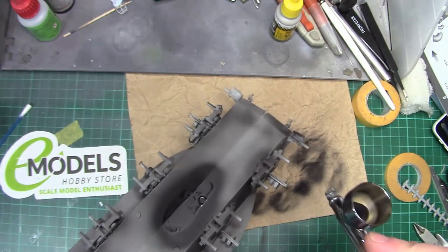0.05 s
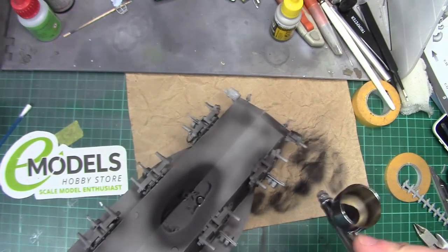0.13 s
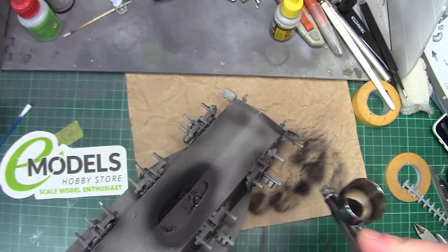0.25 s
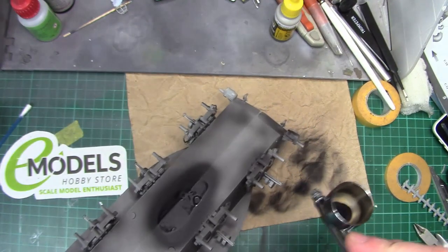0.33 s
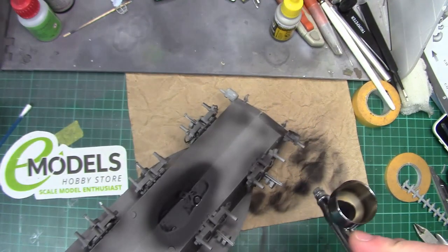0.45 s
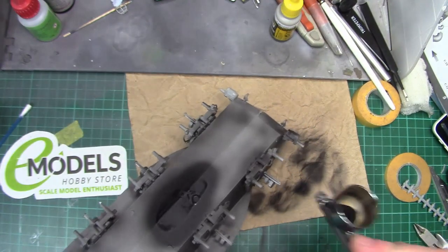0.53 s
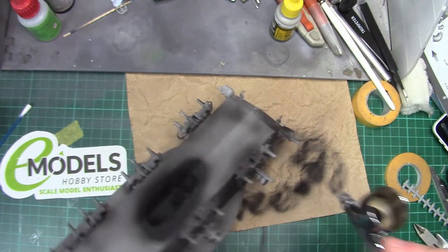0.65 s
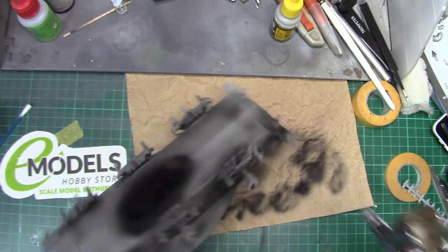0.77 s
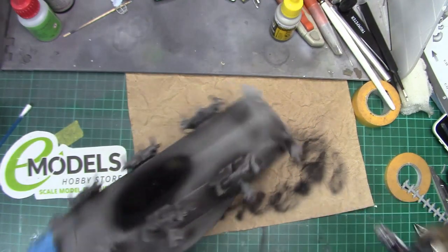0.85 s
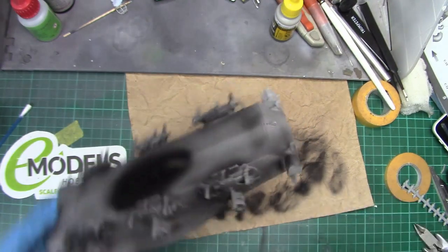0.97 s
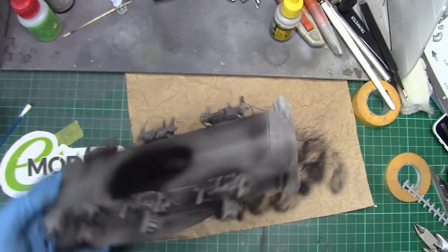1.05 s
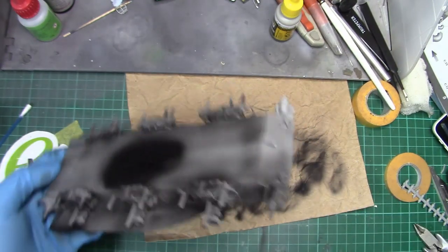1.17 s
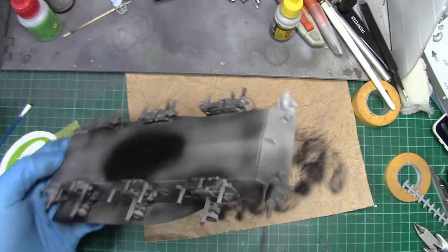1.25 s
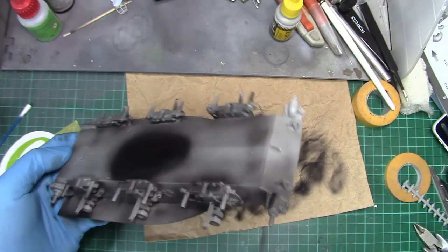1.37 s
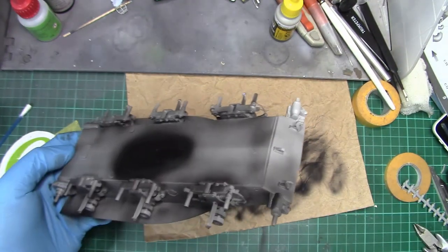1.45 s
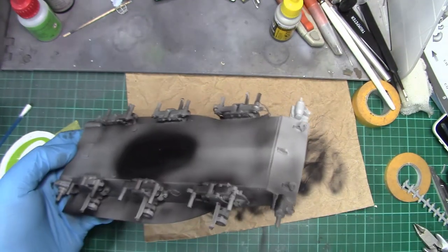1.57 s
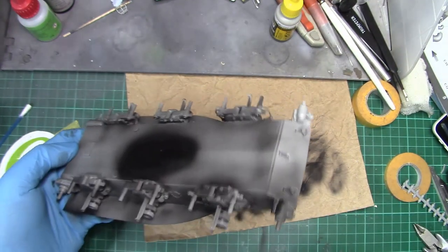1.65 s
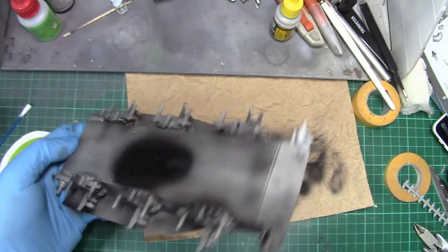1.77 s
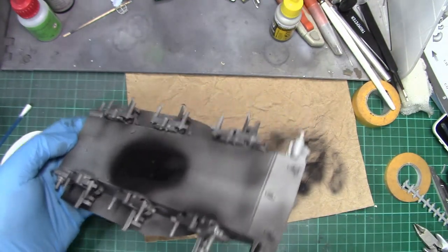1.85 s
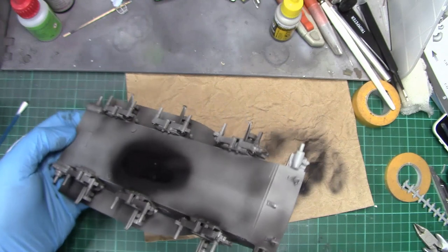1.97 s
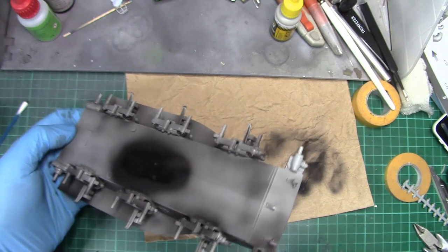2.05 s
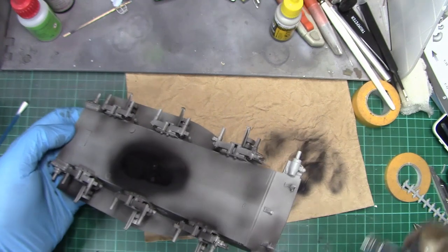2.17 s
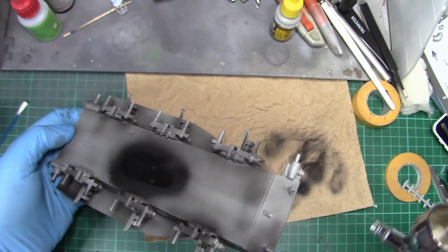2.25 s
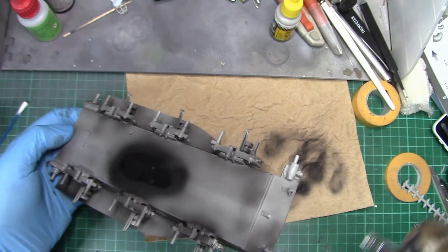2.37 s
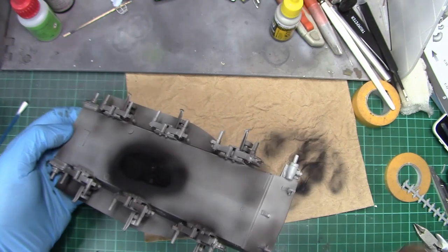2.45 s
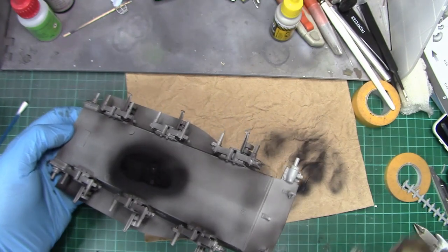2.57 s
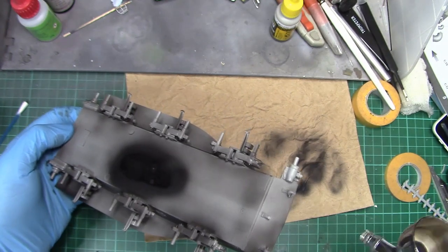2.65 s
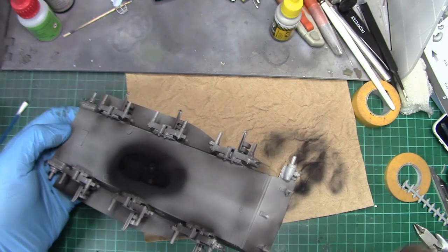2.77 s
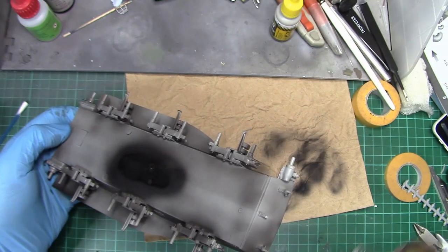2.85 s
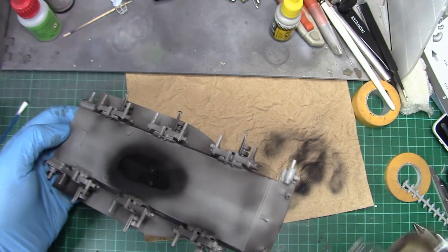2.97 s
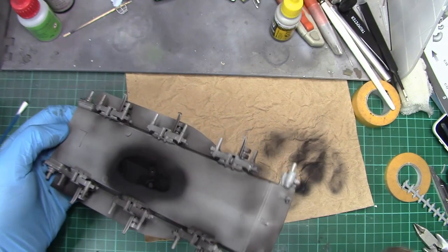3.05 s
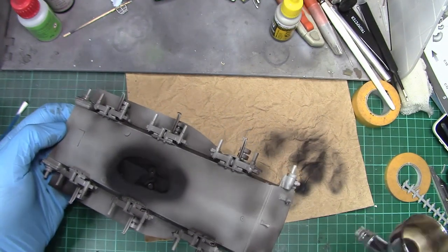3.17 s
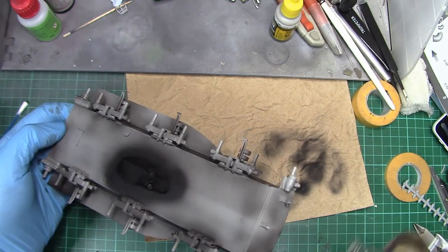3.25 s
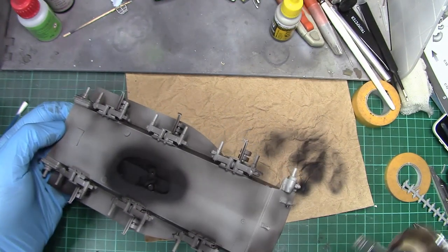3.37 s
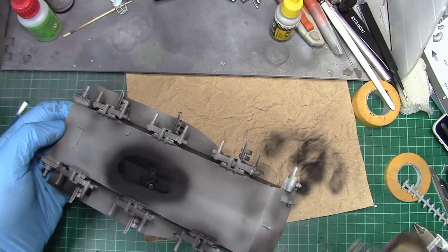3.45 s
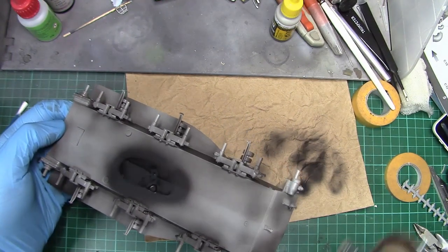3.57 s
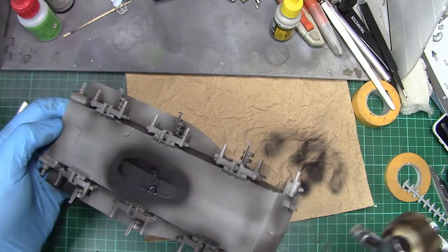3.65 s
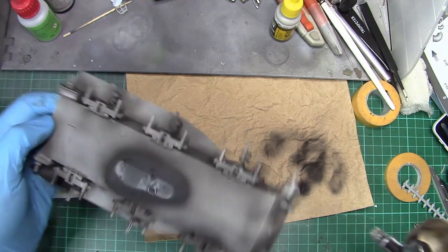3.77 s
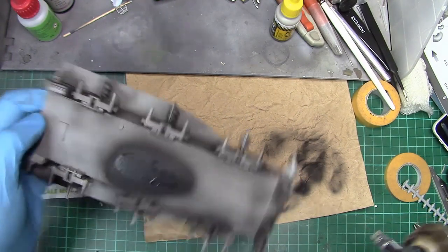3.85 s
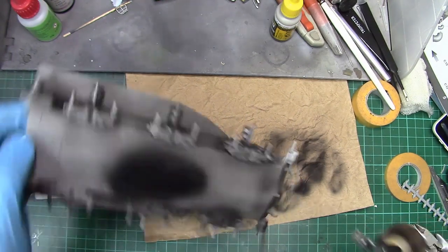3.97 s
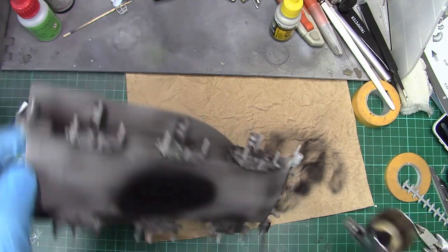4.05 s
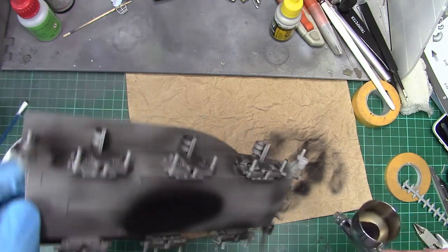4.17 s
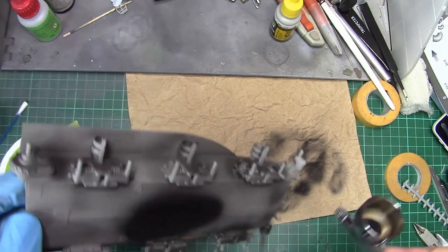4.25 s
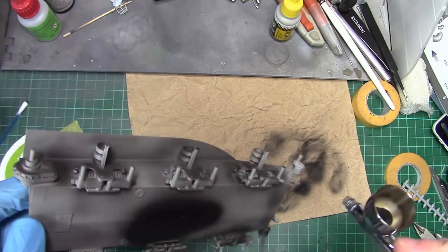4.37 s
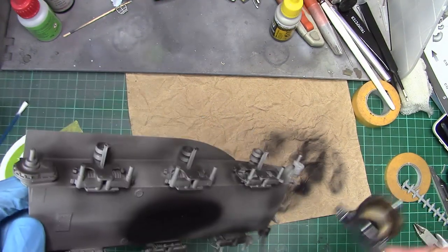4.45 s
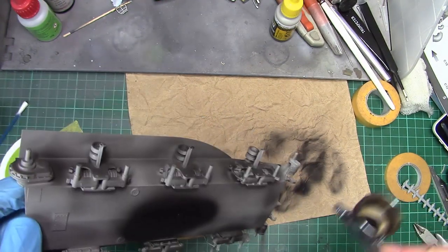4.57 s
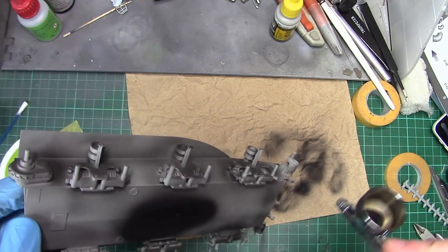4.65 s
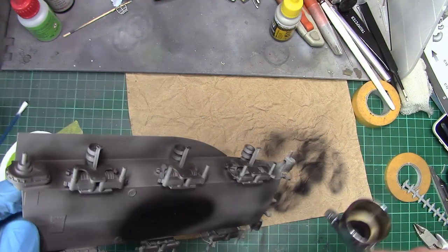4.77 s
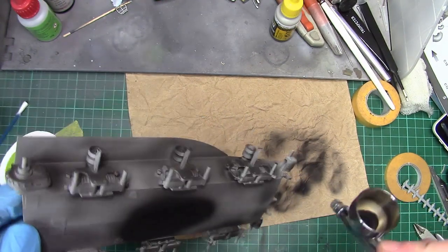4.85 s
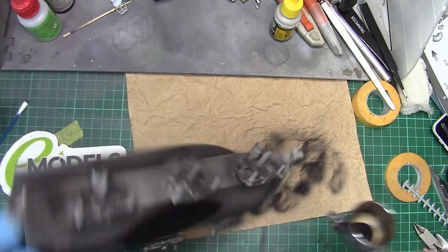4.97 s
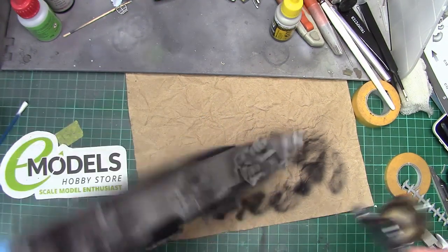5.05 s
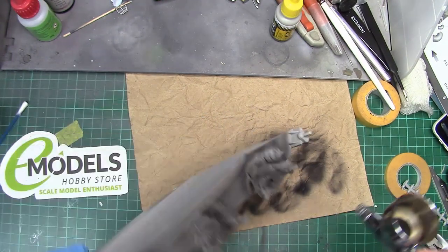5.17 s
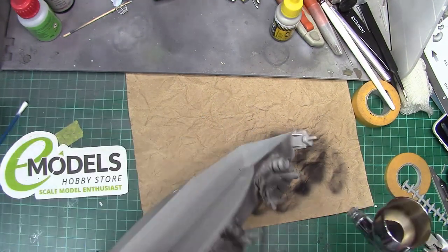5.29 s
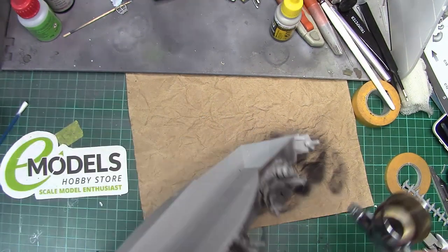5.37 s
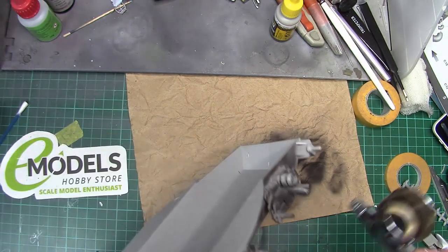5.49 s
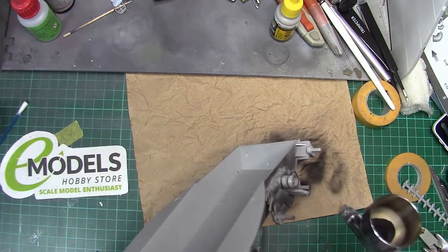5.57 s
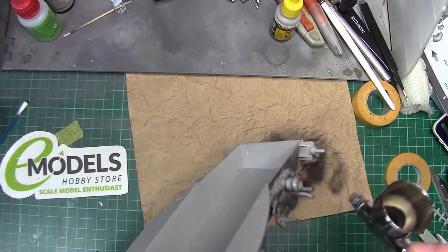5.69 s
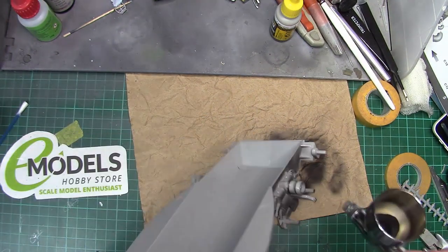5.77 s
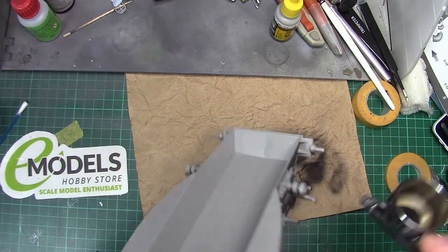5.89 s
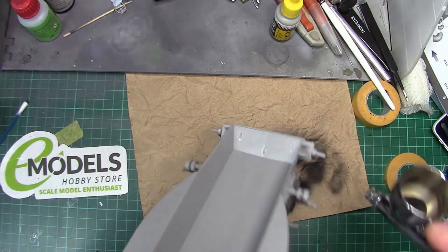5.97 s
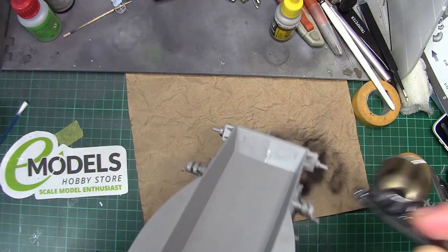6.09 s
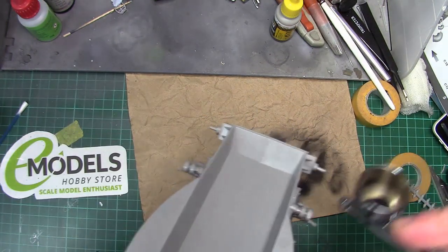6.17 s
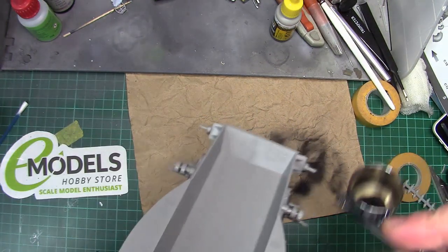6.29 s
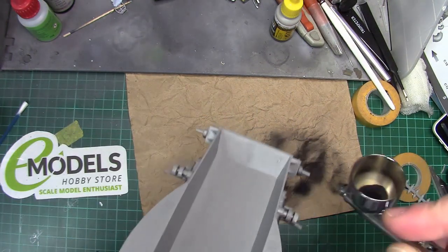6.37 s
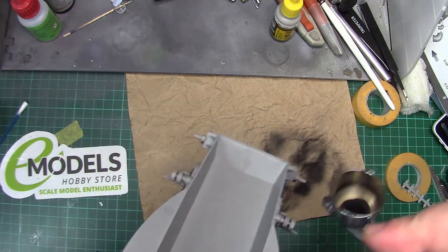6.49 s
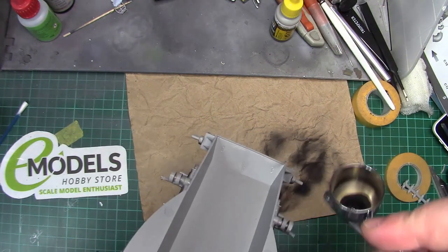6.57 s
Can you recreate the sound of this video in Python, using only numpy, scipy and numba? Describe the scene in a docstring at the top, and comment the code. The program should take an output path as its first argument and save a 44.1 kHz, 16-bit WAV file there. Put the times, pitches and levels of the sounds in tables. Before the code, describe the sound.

An airbrush blows five hissing bursts onto a hollow plastic model, with short gaps where a small piston compressor chugs and hums nearby.

```python
"""Airbrush and small compressor

An airbrush sprays a hollow plastic model on a workbench in five bursts, heard from a camera looking down.
The nozzle is hissing noise; where the jet meets the model, filtered noise roars, rings and echoes off the bench.
Thin whistles and a small tick come from the trigger, a few stray squeaks from the compressor's valve reeds.
A piston compressor chugs nearby as puffs ringing in a pipe, over a sine of motor hum and soft room air."""
import sys
import numpy as np
from scipy import signal
from scipy.fft import rfft, irfft, next_fast_len
from scipy.io import wavfile
from scipy.ndimage import uniform_filter1d
from numba import njit

SR = 44100
rng = np.random.default_rng(int(sys.argv[2]) if len(sys.argv) > 2 else 0)


def put_to_file(sound):
    """Save the sound as 16-bit audio at rate SR, in the file named by the first command-line argument."""
    columns = np.atleast_2d(sound).T  # one column per channel
    safe = np.clip(columns, -1, 1)
    whole_steps = np.round(safe * 32767)
    wavfile.write(sys.argv[1], SR, whole_steps.astype(np.int16))


N = 292383  # length in samples


def undb(db):
    """Turn decibels into a plain factor."""
    return 10 ** (np.asarray(db) / 20)


def level(x, db):
    """Scale a sound to an average (rms) level in dB."""
    return x * undb(db) / np.sqrt(np.mean(x ** 2))


def colour(x, points):
    """Shape a sound by (pitch_hz, level_db) points, flat beyond the ends."""
    hz, db = np.transpose(points)
    size = next_fast_len(N)
    # the 1 keeps the logarithm finite at 0 Hz
    log_hz = np.log(np.arange(size // 2 + 1) * SR / size + 1)
    gain = undb(np.interp(log_hz, np.log(hz), db))
    return irfft(rfft(x, size) * gain, size)[:N]


def curves(table):
    """Draw straight lines through the rows; one curve for each column after the time."""
    s, *columns = np.transpose(table)
    return [np.interp(np.arange(N) / SR, s, column) for column in columns]


def walk(rate):
    """Random levels held 1 / rate seconds, then smoothed twice; spread near 1."""
    hold = int(SR / rate)
    steps = np.repeat(rng.standard_normal(N // hold + 1), hold)
    return 1.07 * uniform_filter1d(uniform_filter1d(steps, hold), hold)[:N]


def delayed(x, lag_s):
    """The same sound later; the delay may move."""
    return np.interp(np.arange(N) - lag_s * SR, np.arange(N), x)


def echo(x, lag_s, share):
    """The sound plus a later copy of itself."""
    return x + share * delayed(x, lag_s)


@njit
def svf(x, hz, width):
    """Resonance (state-variable band-pass) with moving centre and width in Hz, gain 1 at the centre."""
    y, band, low = np.empty(len(x)), 0., 0.
    for i in range(len(x)):
        g, k = np.tan(np.pi * hz[i] / SR), width[i] / hz[i]
        v = (band + g * (x[i] - low)) / (1 + g * (g + k))
        band, low, y[i] = 2 * v - band, low + 2 * g * v, k * v
    return y


def peaked(x, width_hz, *peaks):
    """Unit-level sound with moving (pitch_hz, level_db) resonances added to it."""
    out = level(x, 0)
    for hz, db in peaks:
        resonance = svf(x, hz, np.full(N, width_hz))
        out = out + undb(db) * level(resonance, 0)
    return out


# tone of the room air: pitch_hz, level_db
AIR_TONE = [(25, -18), (60, -17), (120, -1), (300, -2), (600, -16), (1000, -9), (1800, -19), (2500, -23.5),
            (3100, -22), (7000, -24), (15800, -42)]


def room_air():
    """The quiet room: steady noise with a fixed tone."""
    return level(colour(rng.standard_normal(N), AIR_TONE), -52)


def motor_hum():
    """The motor's steady hum: one sine."""
    hum_hz, hum_db = 121.6, -51.5  # rms level
    return np.sqrt(2) * undb(hum_db) * np.sin(2 * np.pi * hum_hz * np.arange(N) / SR)


# valve reed squeaks, once a stroke: place in the stroke (0-1), length (share of a stroke),
# pitch_hz, level_db (rms), extra_db on every second stroke before that level is set
REED_SQUEAKS = [(.41, .12, 1170, -61, 0), (.83, .16, 2370, -63, 6)]


def reed_squeaks(turn, stroke):
    """The valve reeds squeak: sines that swell at a set place in each stroke, unevenly loud."""
    t, out = np.arange(N) / SR, 0
    for place, length, hz, db, second_db in REED_SQUEAKS:
        luck = rng.standard_normal(stroke[-1] + 1)[stroke]
        swell = np.exp(-((turn % 1 - place) / length) ** 2)
        swell = swell * undb(5.5 * luck + second_db * (1 - stroke % 2))
        rough = 1 + .5 * walk(150)
        out = out + level(swell * rough * np.sin(2 * np.pi * hz * t), db)
    return out


def valve_rattle():
    """The compressor's valve noise: a steady band of noise around 2300 Hz."""
    noise = rng.standard_normal(N)
    return level(svf(noise, np.full(N, 2300.), np.full(N, 600.)), -57)


# compressor strokes, a little quicker as time goes on: time_s, stroke number
STROKE_TIMES = [(-.0303, 0), (.7084, 16), (3.8469, 84), (5.0920, 111), (5.9216, 129), (6.6589, 145)]
# tone of one soft puff, without treble: pitch_hz, level_db
PUFF_TONE = [(50, 5), (780, 0), (1000, -37), (1300, -35), (2000, -60)]
# ringing of the casing and intake pipe: pitch_hz, width_hz, level_db (against each other),
# added_width_hz late in the stroke
PIPE_RINGS = [(65, 11, -28, 0), (130.7, 4, -16.5, 19), (171.2, 11.4, -7.5, -6), (288.8, 17.8, 3, 40),
              (358.6, 22.5, -2, 60), (424.4, 13.3, -0.5, 56), (540, 2.7, -17, 60), (705.5, 5.8, -2, 130)]


def compressor():
    """Each stroke puffs into the intake pipe; late in the stroke the open valve changes how fast it dies away."""
    time_s, count = np.transpose(STROKE_TIMES)
    turn = np.interp(np.arange(N) / SR, time_s, count)
    stroke = turn.astype(int)
    size = undb(.6 * rng.standard_normal(stroke[-1] + 1)[stroke])
    puffs = colour(-size * np.diff(stroke, prepend=0), PUFF_TONE)
    valve_open = np.exp(-((turn % 1 - .84) / 0.057) ** 2)
    pipe = 0
    for hz, width, db, added_width in PIPE_RINGS:
        widths = width + added_width * valve_open
        pipe = pipe + undb(db) * svf(puffs, np.full(N, 1. * hz), widths) / widths
    return level(pipe, -36.5) + motor_hum() + reed_squeaks(turn, stroke) + valve_rattle()


# thin whistles from the trigger, and a few stray squeaks near 2400 Hz from the compressor's valve reeds:
# start_s, length_s, start_hz, end_hz, level_db (rms before fading and wavering)
WHISTLES_AND_STRAY_SQUEAKS = [(.7, .04, 3760, 3750, -58), (3.82, .17, 3000, 3240, -56),
                              (3.945, .04, 3190, 3250, -52), (3.96, .05, 2400, 2560, -53),
                              (5.065, .044, 2350, 2310, -47), (5.12, .07, 4280, 4290, -60),
                              (5.215, .026, 2400, 2460, -49), (5.99, .03, 2400, 2400, -55)]


def whistles_and_stray_squeaks():
    """Trigger whistles and stray reed squeaks: narrow noise that glides, swells and wavers."""
    t, out = np.arange(N) / SR, 0
    waver = undb(2.5 * walk(180))
    for start_s, length_s, start_hz, end_hz, db in WHISTLES_AND_STRAY_SQUEAKS:
        part = np.clip((t - start_s) / length_s, 0, 1)
        pitch = start_hz + (end_hz - start_hz) * part
        breathy = level(svf(rng.standard_normal(N), pitch, np.full(N, 25.)), db)
        out = out + np.sin(np.pi * part) ** .5 * waver * breathy
    return out


# trigger ticks: start_s, level_db (roughly the peak)
TRIGGER_TICKS = [(3.835, -44)]


def trigger_ticks():
    """A small metal tick: three high sines that die away in a few milliseconds."""
    t, out = np.arange(N) / SR, 0
    for start_s, db in TRIGGER_TICKS:
        since = t - start_s
        ring = sum(np.sin(2 * np.pi * hz * since) for hz in (3600, 5150, 5800)) / 2
        out = out + undb(db) * (since > 0) * np.exp(-np.abs(since) / .003) * ring
    return out


# trigger pulls: half_open_s, half_shut_s, creep_db (air creeping out just before)
TRIGGER_PULLS = [(-.2, 0.639, -40), (1.038, 3.759, -36), (4.039, 5.033, -24), (5.262, 5.833, -42),
                 (6.144, 6.94, -54)]


def valve():
    """Air flow, near 0 shut and 1 open: a faint creep, a smooth opening, a quicker shutting and a short tail."""
    open_s, shut_s, creep_s, tail_s = 0.0092, 0.0042, 0.063, .016  # how gradual each step is
    tail_share = 0.27  # air left in the brush that runs out after each pull
    t, flow = np.arange(N) / SR, 0

    def step(x):
        """A smooth rise from 0 to 1."""
        return .5 + .5 * np.tanh(x / 2)

    for opens, shuts, creep_db in TRIGGER_PULLS:
        rise = step((t - opens) / open_s) + undb(creep_db) * step((t - opens) / creep_s)
        fall = (1 - tail_share) * step((shuts - t) / shut_s) + tail_share * step((shuts - t) / tail_s)
        flow = flow + rise * fall
    return flow


# tone of the nozzle hiss: pitch_hz, level_db
HISS_TONE = [(470, -40), (800, -46), (977, -2), (1210, -65), (1550, -10.5), (2860, -11.5), (5970, -1.5),
             (7020, -2.5), (7760, -1.5), (15800, -5.5)]


def nozzle_hiss(gain):
    """Air rushing from the nozzle: gently fluttering noise with a resonance of the nozzle cap."""
    cap_hz, cap_db = 13140, -20
    noise = colour(rng.standard_normal(N), HISS_TONE)
    return peaked(noise, 1100., (np.full(N, 1. * cap_hz), cap_db)) * gain * undb(1.0 * walk(40))


# tone of the roar where the jet strikes: pitch_hz, level_db
ROAR_TONE = [(150, -35), (300, -13), (450, 0), (800, -3), (1150, -7), (1500, -2), (2200, -17.5),
             (4000, -41)]


def hull_roar(gain, hull_hz, hull_db, rumble_db):
    """The jet roars on the model: low noise with a hull resonance, plus rumble from air over flat panels."""
    rumble_tone = [(100, -20), (200, -3.5), (300, -0.5), (450, -8), (800, -29)]  # pitch_hz, level_db
    rumble = level(colour(rng.standard_normal(N), rumble_tone), rumble_db)
    roar = peaked(colour(rng.standard_normal(N), ROAR_TONE), 180.0, (hull_hz, hull_db))
    return (roar + rumble) * gain


def hollow_ring(gain, hollow_hz, width_hz):
    """The hollow rings: noise through the same moving resonance twice."""
    once = svf(rng.standard_normal(N), hollow_hz, width_hz)
    return level(svf(once, hollow_hz, width_hz), 0) * gain


# tone of the edge noise: pitch_hz, level_db
EDGE_TONE = [(1200, -25), (2000, 5.5), (2800, -2.5), (4000, 2.5), (5500, -0.5), (7500, -3.5), (11000, -37)]


def edge_noise(gain, fitting_hz, fitting_db):
    """Air tears at the edges: brighter noise with the ring of two fittings, one lower than the other."""
    higher = fitting_hz, fitting_db
    lower = 0.774 * fitting_hz, fitting_db + 1.5
    return peaked(colour(rng.standard_normal(N), EDGE_TONE), 310.0, higher, lower) * gain


# what bench clutter throws back: pitch_hz, level_db
CLUTTER_TONE = [(700, -31), (1800, -11), (4000, -8.5), (15000, -17)]


def clutter(jet, count=8):
    """Short echoes off hands, model and tools; their paths drift as the hands move."""
    back = 0
    for lag_s in 0.000804 + .004 * rng.random(count):
        back = back + delayed(jet, lag_s + .00007 * walk(2.53))
    return jet + colour(back / np.sqrt(count), CLUTTER_TONE)


# how model and brush are held: time_s, hiss_db, rumble_db (against the roar), hull_hz, hull_db
# (against the roar), hollow_hz, hollow_width_hz, extra_ring_db, extra_edge_db, fitting_hz,
# extra_fitting_db, bench echo (0-1)
HOLDING = [(0, -24, -18, 1020, -1.5, 1380, 400, 0.5, 1.5, 4450, 0, 0.02),
           (.62, -23.5, -14, 1036, 5.5, 1480, 400, 5.5, 7, 4500, 2, 0.04),
           (1.03, -22.5, -4, 790, -16, 1770, 400, 1, -11, 3300, 1.5, 0.16),
           (1.27, -24, 2, 800, -11, 1710, 400, -5, -13, 3300, 1.5, 0.2),
           (1.29, -22.5, -2.5, 800, -7, 1544, 200, 11, -1, 3350, 1.5, 0),
           (1.52, -22, -11, 800, -22, 1570, 198, 5, -0.5, 3420, -6, 0),
           (1.72, -23.5, -21, 810, -12, 1560, 260, 0.5, -5, 3370, 2, 0),
           (2.1, -21, -39, 990, -15.5, 1694, 330, 2.5, 0.5, 3760, -3, 0.3),
           (2.5, -23.5, -40, 1020, -4, 1726, 405, 3.5, -0.5, 3900, 4.5, 0.2),
           (2.8, -22, -19, 860, -23, 1810, 420, -3.5, -6.5, 3800, 3, 0.16),
           (3.3, -20, -18.5, 930, -5.5, 1810, 413, -0.5, -1, 3820, 0.5, 0.02),
           (3.75, -23, -22, 1000, -4.5, 1770, 420, 10, 8, 3780, -3, .15),
           (4.05, -24.5, -16, 1000, 4.5, 1976, 700, 7, 8.5, 4100, 1.5, 0.05),
           (4.5, -25.5, -14, 1040, 1, 1930, 715, 3, 12.5, 4030, -4, 0),
           (5.0, -24.5, -19, 1010, 0.5, 1830, 805, 3, 7, 4040, -3, 0),
           (5.25, -23.5, -20, 950, -5, 1790, 850, -4.5, 3.5, 3720, -5, 0.35),
           (5.85, -21, -19, 960, -11.5, 1710, 830, -0.5, 6.5, 3640, -5, 0.2),
           (6.12, -23, -25, 1040, -2, 1750, 810, 3.6, 3, 3650, 0.5, 0.34),
           (6.63, -23.5, -21, 1010, -9, 1800, 800, 1, -1.5, 3660, 3, 0.5)]
# how hard the jet strikes the model, one curve for each pull: time_s, level_db
STRIKE_CURVES = [
    [(0.0, -21.5), (0.154, -21), (0.208, -27), (0.292, -22), (0.536, -25), (0.592, -30), (0.62, -39)],
    [(1.05, -27), (1.15, -35), (1.21, -46), (1.36, -19.5), (1.37, -25.5), (1.53, -27), (1.62, -17.5),
     (1.63, -20), (1.72, -11.5), (1.78, -12.5), (1.82, -20.5), (2.01, -14.5), (2.02, -11), (2.03, -14.5),
     (2.04, -12), (2.18, -15.5), (2.26, -19.5), (2.4, -14), (2.52, -15.5), (2.54, -19.5), (2.68, -21.5),
     (2.9, -21), (3.42, -20.5), (3.46, -24.5), (3.65, -23.5), (3.74, -37.5)],
    [(4.05, -32.5), (4.108, -28.5), (4.3, -27.5), (4.344, -37), (4.486, -27), (4.574, -30), (4.6, -33.5),
     (4.69, -27.5), (4.84, -29.5), (4.93, -22.5), (5.02, -31)],
    [(5.27, -31), (5.392, -21.5), (5.812, -19.5), (5.83, -18.5)],
    [(6.16, -21), (6.238, -19.5), (6.264, -19), (6.276, -19), (6.346, -23.5), (6.462, -14), (6.584, -20),
     (6.63, -15)],
]
# what seeps out all the time: hiss_db, roar_db, ring_db, edge_db
SEEP_DB = (-72, -57.5, -62, -66.5)


def spray():
    """Turbulent jet: hiss at the nozzle, and fluttering roar, ring and edge noise where it strikes."""
    (hiss_db, rumble_db, hull_hz, hull_db, hollow_hz, hollow_width, ring_db, edge_db,
     fitting_hz, fitting_db, bounce) = curves(HOLDING)
    usual_db = -18
    strike = curves(np.concatenate(STRIKE_CURVES))[0] - usual_db  # dB above the usual strike
    # level at the usual strike, plus dB gained per dB of strike
    levels_db = (hiss_db - 0.14 * np.maximum(strike, 0),  # a hard strike weakens the hiss a little
                 -22.5 + 0.91 * strike,
                 -21.5 + 1.7 * strike + ring_db,
                 -25.5 + 1.05 * strike + edge_db)
    fitting_db = fitting_db - 8.5 + 0.88 * strike
    flow = valve()
    gains = [undb(db) * flow + undb(seep) for db, seep in zip(levels_db, SEEP_DB)]
    hiss_gain, roar_gain, ring_gain, edge_gain = gains
    roar = hull_roar(roar_gain, hull_hz, hull_db, rumble_db)
    edge = edge_noise(edge_gain, fitting_hz, fitting_db)
    # the detour via the bench is two wavelengths of the hollow's pitch
    struck = echo(roar + edge, 2 / hollow_hz, bounce) + hollow_ring(ring_gain, hollow_hz, hollow_width)
    eddies = undb(1.05 * walk(60))
    return clutter(nozzle_hiss(hiss_gain) + eddies * struck)


# share of the spray that differs left and right: pitch_hz, level_db
SPRAY_WIDTH = [(250, -30), (700, -36), (1300, -36), (2400, -28), (4400, -21), (8000, -16), (15000, -19)]


def scene():
    """Mix in stereo: a shared middle, and a side signal added left and taken away right."""
    pump = compressor()
    mid = room_air() + pump + whistles_and_stray_squeaks() + trigger_ticks() + spray()
    late_pump = np.roll(pump, SR // 250)  # 4 ms later
    side = undb(-11) * room_air() + undb(-28) * late_pump + colour(spray(), SPRAY_WIDTH)
    return np.array([mid + side, mid - side])


def record(dry):
    """A near reflection off the camera body ripples the treble; bass rolls off, peaks round, the top is cut."""
    near = np.array([echo(channel, 0.000377, 0.1) for channel in dry])
    thin = signal.sosfilt(signal.butter(3, 62., "high", fs=SR, output="sos"), near)
    soft = thin / (1 + thin ** 4) ** .25
    top_hz = 15800
    return signal.sosfilt(signal.ellip(10, .2, 80, top_hz, fs=SR, output="sos"), soft)


dry = scene()
out = record(dry)
put_to_file(out)
```